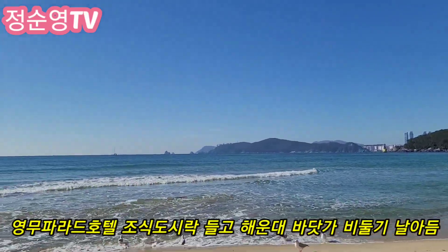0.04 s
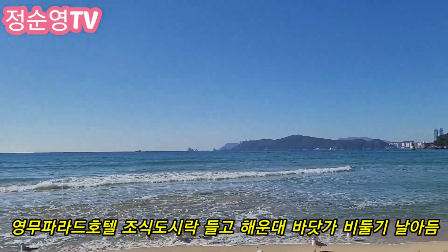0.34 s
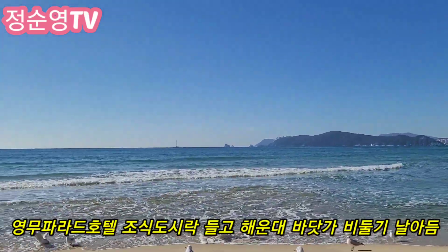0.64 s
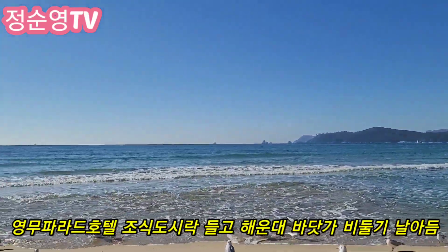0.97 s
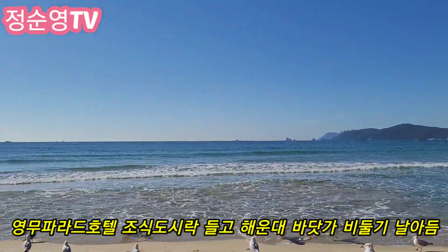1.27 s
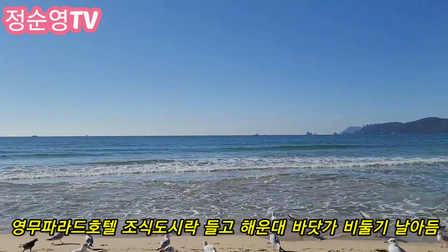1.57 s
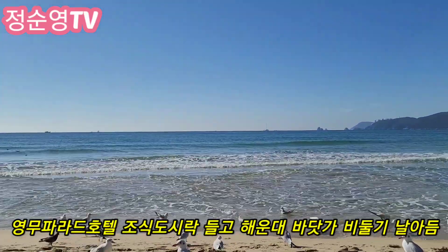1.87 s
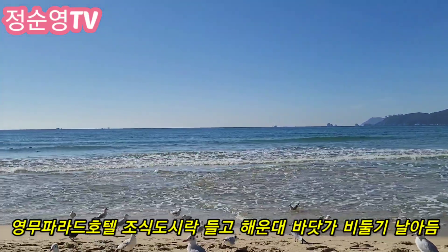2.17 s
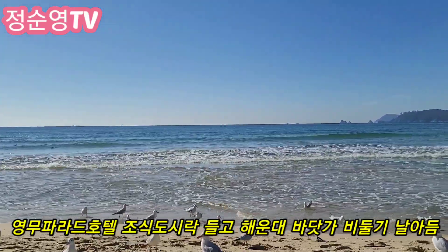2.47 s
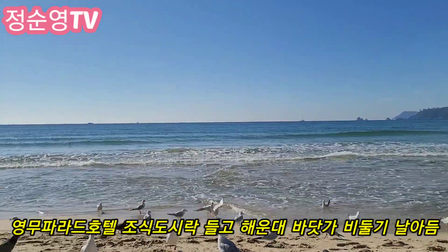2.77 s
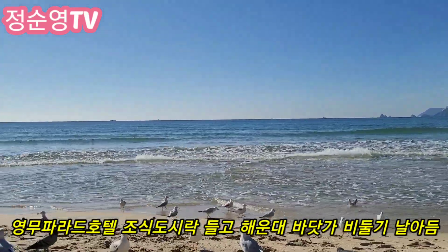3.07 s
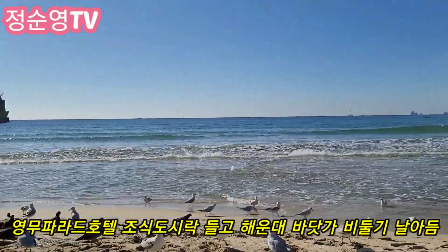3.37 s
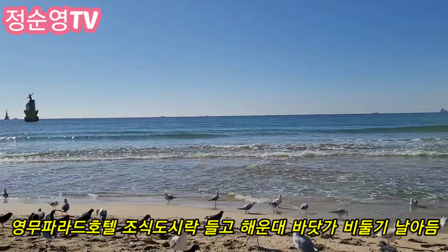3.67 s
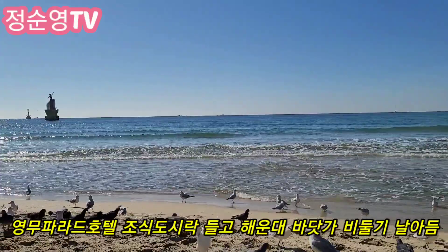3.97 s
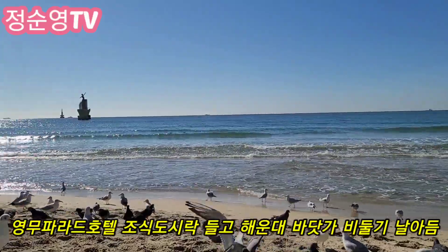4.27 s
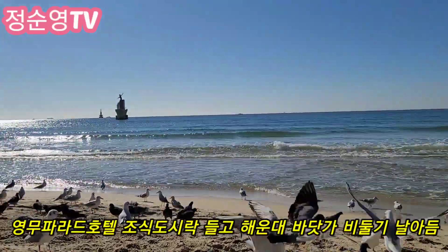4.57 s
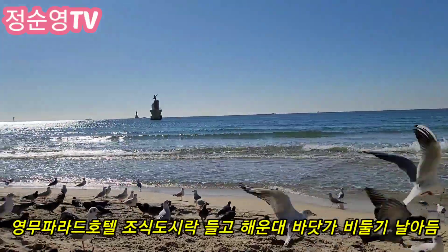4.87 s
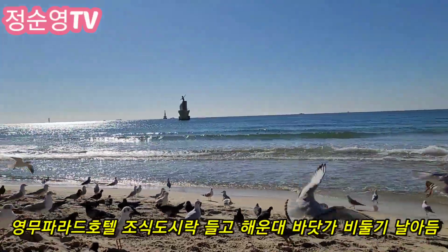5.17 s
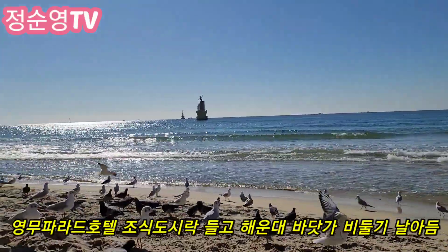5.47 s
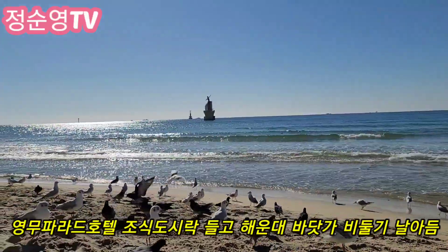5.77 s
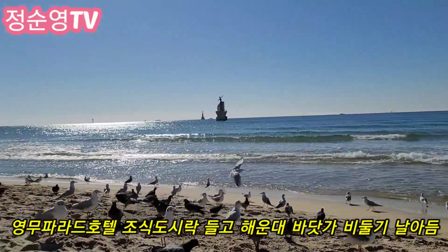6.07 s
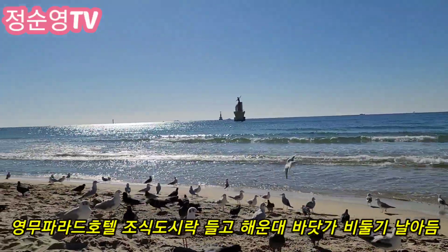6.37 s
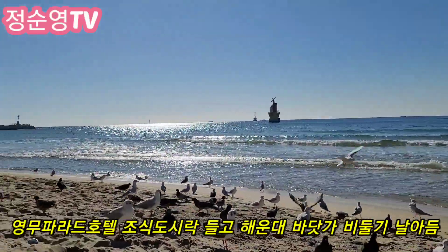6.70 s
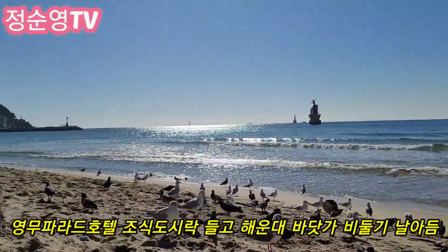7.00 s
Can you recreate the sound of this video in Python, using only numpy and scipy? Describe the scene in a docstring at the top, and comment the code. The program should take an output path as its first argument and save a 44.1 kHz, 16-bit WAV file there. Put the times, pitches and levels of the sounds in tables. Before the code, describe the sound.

Short raspy gull squawks and a few higher squeals sound on a beach, with fizzing wavelets and gusts buffeting the microphone.

```python
"""Small surf and a rumble of wind, then at once gulls squabbling on a sandy beach, a few steps away.
Each cry is a whistle near 1 kHz, arching in pitch and chopped about 100 times a second into a harsh
rattle; a few squeals lie an octave higher, and the flock chatters further off. Wavelets churn and fizz
behind the birds. Gusts buffet the two microphone ports of a hand-held phone, which turns slowly."""
import sys
import numpy as np
from scipy import signal
from scipy.fft import rfft, irfft
from scipy.io import wavfile
from scipy.ndimage import uniform_filter1d, map_coordinates

SR = 44100
rng = np.random.default_rng(int(sys.argv[2]) if len(sys.argv) > 2 else 0)


def store_pcm(level_fs):
    """Save levels as 16-bit WAV."""
    pcm = np.round(np.clip(level_fs, -1, 1) * 32767).astype(np.int16)
    wavfile.write(sys.argv[1], SR, np.atleast_2d(pcm).T)


N = 314874
TIME = np.arange(N) / SR
TOP_HZ = 15900  # upper limit of the phone


def undb(db):
    """Decibels to gain."""
    return 10 ** (np.asarray(db) / 20)


def unit(x):
    """Scale to rms 1."""
    return x / np.sqrt(np.mean(x ** 2) + 1e-18)


def curves(table):
    """The columns of a table of (t/s, ...) rows, sample by sample."""
    times, *columns = np.transpose(table)
    return [np.interp(TIME, times, column) for column in columns]


def along(hz, points):
    """Read (f/Hz, value) points on a log-frequency axis."""
    at, value = np.transpose(points)
    return np.interp(np.log(np.maximum(hz, 1)), np.log(at), value)


def colour(x, points):
    """Filter by a spectrum of (f/Hz, gain/dB) points."""
    n = x.shape[-1]
    return irfft(rfft(x) * undb(along(np.fft.rfftfreq(n, 1 / SR), points)), n)


def walk(rate, n=N):
    """Smooth random drift that changes rate times a second; spread near 1."""
    k = max(int(SR / rate), 1)
    held = np.repeat(rng.standard_normal(n // k + 1), k)
    return np.sqrt(2) * uniform_filter1d(uniform_filter1d(held, k), k)[:n]


def pan(db):
    """Left and right gains for a level difference, at constant power."""
    gains = undb(np.array([db, -db]) / 2).reshape(2, -1)
    return gains / np.sqrt(np.mean(gains ** 2, axis=0))


def add(out, start, sound):
    """Mix a sound (channels x samples) in at a time."""
    i = max(int(start * SR), 0)
    out[:, i:i + sound.shape[1]] += sound[:, :max(N - i, 0)]


def surf(wash_db=7, foam_db=3.0, churn_db=2.05, fizz_db=1.0):
    """Behind the birds, breaking wavelets churn in the middle range while bursting foam fizzes above."""
    # rise and fall of the surf: t/s, relative wash level/dB, relative foam level/dB
    swell = [(0, -46.5, -50.5), (.6, -47.5, -51), (1.3, -48, -54), (2.3, -49.5, -57.5), (4.3, -48, -55),
             (5.9, -49, -55), (6.75, -47, -51.5), (7.14, -46.5, -52)]
    # spectrum of the surf: f/Hz, level/dB
    wash_colour = [(150, -25), (250, -2.5), (313, -8.5), (649, -2), (857, -9), (1230, -2.5), (1370, -2.5),
                   (1780, -2.5), (2380, -6.5), (3150, -10.5), (3430, -12.5), (4080, -15), (4770, -18.5),
                   (6990, -20), (15800, -30.5)]
    # likeness of the surf at the two ports: f/Hz, correlation
    port_likeness = [(250, 0.83), (600, 0.57), (1200, -0.27), (2000, 0.24), (4000, -0.042), (12000, 0.018)]
    # the sea swings rightwards as the phone turns: t/s, left minus right/dB
    sea_side = [(1.8, 2.5), (4.4, 2), (4.9, -0.5), (7.14, -0.5)]
    body_db, hiss_db = curves(swell)
    hz = np.fft.rfftfreq(N, 1 / SR)
    likeness = np.clip(along(hz, port_likeness), -1, 1)
    mid, side = rfft(rng.standard_normal((2, N)) * undb(fizz_db * np.array([walk(1500), walk(1500)])))
    mid, side = mid * np.sqrt(1 + likeness), side * np.sqrt(1 - likeness)
    spectrum = rfft(colour(irfft(np.array([mid + side, mid - side]), N), wash_colour))
    octave = np.clip(np.log2(np.maximum(hz, 1) / 250), 0, 6)
    bands = (irfft(spectrum * np.maximum(1 - abs(octave - k), 0), N) for k in range(7))
    water = sum(band * undb(churn_db * walk(12)) for band in bands)  # each octave swells on its own
    foam = colour(water, [(2200, -25), (4500, -1.0)])
    sea = unit(water - foam) * undb(body_db + wash_db) + unit(foam) * undb(hiss_db + foam_db)
    return sea * pan(curves(sea_side)[0])


def wind_force(attack_s=0.086, release_s=0.078, lee_db=-29, swirl_db=3.0, swirl_rate=15):
    """Wind strength at each port: a swirling breeze, plus gusts that swell, hold and die away."""
    # gusts on the windward (left) port: t/s, hold/s, level/dB
    gust_times = [(0.726, 0.48, -35.5), (1.557, 0.23, -32), (1.862, 0.17, -29.5), (2.14, .27, -35.5),
                  (2.568, 0.29, -34), (4.007, 0.23, -26.5), (4.339, 0.11, -28), (4.546, 0.029, -27)]
    # the breeze on both ports, with its lulls: t/s, level/dB
    breeze_level = [(0, -40), (2.95, -40), (3.12, -47.5), (3.25, -37.5), (3.45, -42), (3.7, -41.5),
                    (5.05, -36.5), (5.3, -45), (6.25, -37), (7.14, -40)]
    gusts = np.zeros(N)
    for start, hold, db in gust_times:
        corners = [start - attack_s, start, start + hold, start + hold + release_s]
        gusts += undb(db) * np.interp(TIME, corners, [0, 1, 1, 0])
    force = np.hypot(undb(curves(breeze_level)[0]), gusts * undb([[0], [lee_db]]))
    return force * undb(swirl_db * np.array([walk(swirl_rate), walk(swirl_rate)]))


def wind(rumble_db=3, eddy_db=-5.0, strong_db=-27, eddy_growth=0.7, flutter_db=3.0):
    """Each microphone port rumbles on its own; the stronger the gust, the more quick eddies it carries."""
    # rumble of a light breeze on a port: f/Hz, level/dB
    breeze_colour = [(18, -31), (35, -5), (60, 0.5), (100, -4.5), (160, -11.5), (300, -37.5), (600, -62)]
    # eddies in a strong gust: f/Hz, level/dB
    eddy_colour = [(40, -47), (110, -5), (200, 4), (320, -5), (500, -18.5), (900, -80)]
    force = wind_force()
    slow, quick = rng.standard_normal((2, 2, N))
    eddy_share = undb(eddy_db) * np.minimum(force / undb(strong_db), 2) ** eddy_growth
    eddies = unit(colour(quick, eddy_colour)) * eddy_share * undb(flutter_db * walk(35))
    return force * (undb(rumble_db) * unit(colour(slow, breeze_colour)) + eddies)


def thumps():
    """Short dull knocks of air right on the ports, a few cycles each."""
    # knocks of air: t/s, f/Hz, decay/s, peak/dB, left minus right/dB
    knocks = [(0.061, 88, 0.01, -23, -19), (0.753, 109, 0.0088, -16, 33), (3.582, 260, 0.011, -26.5, 21),
              (3.603, 343, 0.0035, -26, 24), (4.109, 125, 0.0097, -16, 21)]
    out, t = np.zeros((2, N)), TIME[:SR // 8]
    for start, hz, decay, db, pan_db in knocks:
        swell = 2 * t / decay * np.exp(1 - 2 * t / decay)
        phase = 2 * np.pi * np.cumsum(hz * (1 + 0.18 * walk(197, len(t)))) / SR
        add(out, start, undb(db) * pan(pan_db) * swell * np.sin(phase))
    return out


def cry(length, top_hz, glide, rattle_hz, rasp, ring_db, bright_db, edge_db,
        chirp=0.18, waver=0.01835, hiss_db=-10, spit_db=3, tremble_db=1.5):
    """One cry at the beak, after a half-length lead-in: a whistling membrane chopped by a slower one."""
    # arch of a cry: share of its length, share of the top pitch, level/dB
    arch = [(-.45, .66, -32.5), (-.06, .72, -14), (0.099, .92, -1.5), (.28, 0.98, 3), (0.519, 0.98, 3),
            (.76, .93, 0), (0.919, .84, -6), (1.05, .72, -16), (1.15, 0.44, -36)]
    # resonances of throat and beak: f/Hz, gain/dB
    throat = [(600, -25.5), (1050, -23), (1450, 5), (2050, 1.5), (2600, 4), (3200, 2), (3600, 0),
              (4200, -4), (5400, -9), (6000, -15), (6900, -15), (8300, -25.5), (12000, -26), (15000, -25.5)]
    t = np.arange(int(2 * length * SR)) / SR - length / 2
    n, part = len(t), t / length
    share, pitch, loud_db = np.transpose(arch)
    pulses = rattle_hz * np.cumsum(1 + 0.084 * rasp * walk(150, n)) / SR
    pulses = pulses - pulses[n // 4]  # counted from the end of the lead-in
    cycle = pulses % 1
    # the slow valve shuts briefly in each cycle; it leaks in raspy cries and in the lead-in
    opening = np.clip((np.minimum(cycle, 1 - cycle) - .06) / .22, 0, 1)
    leak = np.clip(0.7 * rasp ** 2 - 5 * np.minimum(part, 0), 0, 1)
    gate = leak + (1 - leak) * np.sin(np.pi / 2 * opening) ** 2
    hz = top_hz * np.interp(part, share, pitch) * (1 + glide * (part - .5))
    hz *= 1 + chirp * (1 - leak) * (cycle - .5)  # rises within each pulse as pressure builds
    hz *= 1 + .018 * rng.standard_normal(64)[np.floor(pulses).astype(int)]  # each pulse has its own note
    # the membrane loses its footing near each closure, which smears the upper partials
    unsteady = .024 + .025 * rasp + .05 * (1 - opening)
    phase = 2 * np.pi * np.cumsum(hz * (1 + waver * walk(200.5, n) + unsteady * walk(2500, n))) / SR
    # the partials leave the throat out of step, which rounds the wave
    orders = np.arange(1, int(TOP_HZ / top_hz) + 2)
    offsets = np.pi / 4 * orders ** 2 + .5 * rng.standard_normal(24)[:len(orders)]
    whistle = sum(np.sin(k * phase + offset) for k, offset in zip(orders, offsets))
    # air hisses through each opening, most of all in the top treble
    hiss = colour(rng.standard_normal(n), [(6000, hiss_db), (10000, spit_db)]) * np.hypot(rasp, .35)
    envelope = undb(np.interp(part, share, loud_db) + tremble_db * walk(104.8, n))
    source = (unit(whistle) + hiss) * gate * envelope
    # a wider beak lets more treble out
    beak = [(2350, 0), (2900, ring_db), (4200, ring_db),
            (5000, bright_db), (7500, bright_db), (10500, edge_db)]
    return colour(colour(source, throat), beak)


def scattered(voice, db, half_db=-34, blur_s=0.0069):
    """The fainter a gull, the further off it is, and the more its cry is blurred by sand and water."""
    t = TIME[:SR // 16]
    paths = rng.standard_normal(len(t)) * np.exp(-t / blur_s)
    blurred = unit(signal.fftconvolve(voice, paths)[:len(voice)])
    share = 1 / (1 + undb(db - half_db) ** 3)
    return (np.sqrt(1 - share) * unit(voice) + np.sqrt(share) * blurred) / np.sqrt(2)


def sand(voice, near_db=-12, decay_s=.0015):
    """Rough sand close by scatters a cry at once, differently for every cry and each port."""
    t = TIME[:SR // 64]
    paths = rng.standard_normal((2, len(t))) * np.exp(-t / decay_s)
    reflected = signal.fftconvolve(voice[None], unit(paths) / np.sqrt(len(t)))[:, :len(voice)]
    return voice + undb(near_db) * reflected


def gull(start, length, db, top_hz, glide, rasp, ring_db, bright_db, mean_rattle_hz=104):
    """One cry as it reaches the microphone: the beak's opening sets its colour, distance its blur."""
    # top treble of the cries, above 10 kHz: t/s, gain/dB
    top_treble = [(.4, -4), (1.2, -1.5), (1.7, 1), (2.3, 8), (2.8, -7.5), (3.8, -4), (4.4, -11.5),
                  (6.1, -2)]
    rattle_hz = mean_rattle_hz * (1 + .04 * rng.standard_normal())
    edge_db = np.interp(start, *np.transpose(top_treble))
    voice = cry(length, top_hz, glide, rattle_hz, rasp, ring_db, bright_db, edge_db)
    return undb(db) * sand(scattered(voice, db))


def squawk(start, length, db, top_hz, ring_db, bright_db):
    """A short rattling cry, hoarsest when weak; its pitch sags when the beak stays narrow."""
    # hoarseness of a squawk: level/dB, rasp (0-1)
    hoarseness = [(-41.5, 0.97), (-33.5, 0.34), (-24, 0.52)]
    rasp = np.interp(db, *np.transpose(hoarseness))
    glide = -0.0468 + 0.00903 * ring_db
    return gull(start, length, db, top_hz, glide, rasp, ring_db, bright_db)


def chatter(per_s=4, level_db=-45.5, top_hz=982, length_s=(0.044, 0.061), ring_db=-2, bright_db=-5.5):
    """The flock further off: rows of settings for faint squawks at loose intervals."""
    rows = []
    for k, (late, long, loud, high) in enumerate(rng.uniform(-1, 1, (40, 4))):
        start = (k + .5 + late / 2) / per_s
        length = np.interp(long, (-1, 1), length_s)
        if start < TIME[-1]:
            rows.append((start, length, level_db + 2 * loud, top_hz * (1 + .06 * high), ring_db, bright_db))
    return rows


def gulls(squeal_rasp=.85):
    """The squabble on the sand: squawks and squeals a few steps away, chatter beyond them."""
    # harsh squawks: t/s, length/s, relative level/dB, top pitch/Hz, beak ring near 3.5 kHz/dB,
    # brightness/dB
    squawks = [(0.086, 0.069, -42, 923, 3.5, -10), (0.22, 0.031, -41, 996, 12, 2),
               (0.363, .033, -26.5, 1120, 0.5, 5.5), (0.396, 0.036, -37.5, 986, 8.5, -10),
               (0.781, 0.064, -42.5, 1035, -1.5, -11), (0.868, .05, -43, 988, 0.5, -12),
               (0.94, 0.045, -30.5, 1009, -2.5, -5), (1.178, .045, -24.5, 1061, 1, -2.5),
               (1.48, 0.06, -28.5, 964, -6.5, -2), (1.702, 0.059, -27, 1065, -2, 5.5),
               (1.858, 0.071, -40, 980, 8, -16), (1.907, 0.067, -23.5, 1089, 3.5, 7.5),
               (2.158, 0.057, -22.5, 1081, 3, 6.5), (2.363, 0.064, -22.5, 1102, 3, 4.5),
               (2.563, 0.062, -22, 1103, 0.5, 4.5), (2.651, 0.063, -40, 982, -3, -7),
               (2.808, 0.062, -24.5, 1035, -5.5, 1), (3.008, .063, -36, 964, -6, -18),
               (3.064, .051, -38.5, 870, -5.5, -12), (3.139, 0.045, -41, 1257, -10.5, -24),
               (3.211, 0.053, -25, 1050, -2.5, -4), (3.501, 0.054, -23, 1052, -4, -2.5),
               (3.755, 0.085, -22.5, 1112, -4, -3), (3.93, 0.063, -22.5, 1089, -1, 5.5),
               (4.013, .038, -25, 1092, 3, 5.5), (4.106, 0.033, -35, 992, 3.5, 9),
               (4.186, 0.079, -28, 1029, -2, 2), (4.426, 0.061, -29.5, 1063, -1, -2.5),
               (4.624, 0.058, -29, 1067, -2, -3.5), (4.852, .055, -32, 1066, -3.5, -17),
               (5.047, 0.075, -31.5, 1068, -5, -2), (5.299, 0.066, -35.5, 956, -4, -11),
               (5.431, 0.14, -34, 975, 1, -8.5), (5.742, 0.098, -42.5, 962, -7, -5),
               (6.078, 0.043, -29.5, 1033, -4, -3.5), (6.3, 0.057, -28, 1041, 0, -1),
               (6.397, 0.039, -43.5, 980, -2, -5)]
    # hoarse squeals an octave higher: t/s, length/s, relative level/dB, top pitch/Hz,
    # glide (share of the pitch), beak ring/dB, brightness/dB
    squeals = [(0.504, 0.089, -37, 1876, -.2, 1, -6), (3.438, 0.06, -34.5, 2263, -0.087, 8, 3),
               (4.492, 0.074, -27.5, 2003, 0.27, -7.5, -12), (4.734, .11, -27, 2018, .13, 2.5, -2.5),
               (5.104, 0.064, -29.5, 1940, -0.054, -30, -9)]
    voices = np.zeros((2, N))
    for start, length, db, top_hz, glide, *beak in squeals:
        add(voices, start - length / 2, gull(start, length, db, top_hz, glide, squeal_rasp, *beak))
    for start, length, *voice in list(squawks) + chatter():
        add(voices, start - length / 2, squawk(start, length, *voice))
    return voices


def turning_phone(voices, gain_db=4.0, first_lag_ms=-.025, lag_ms_per_s=.057):
    """The cries reach the left port later and later as the phone turns steadily away."""
    # the phone body colours a cry at each port: f/Hz, left minus right/dB, left phase lead/rad
    ports = [(1100, 2, -.2), (2100, 7, -.6), (2600, 4.5, -1.3), (3200, -3, -2.2), (3800, -6, -4.3),
             (4400, -1, -5.8), (5000, 2, -6.3), (6000, -1.5, -6.6), (7100, -2.5, -6.2), (8400, 5, -4.5),
             (10000, 1, -7), (11800, -2.5, -8.3), (13000, -2, -6.6), (15000, 3, -7.2)]
    # the flock ends up to the right as the phone turns: t/s, left minus right/dB
    flock_side = [(0, 0), (3.3, 1), (4.6, 1), (6, -2)]
    lag_ms = first_lag_ms + lag_ms_per_s * TIME
    left = map_coordinates(voices[0], [(TIME - lag_ms / 1000) * SR], order=5)
    hz = np.fft.rfftfreq(N, 1 / SR)
    balance_db = along(hz, np.array(ports)[:, [0, 1]])
    lead = along(hz, np.array(ports)[:, [0, 2]])
    spectra = np.array([rfft(left) * np.exp(1j * lead), rfft(voices[1])]) * pan(balance_db)
    return undb(gain_db) * irfft(spectra, N) * pan(curves(flock_side)[0])


def beach(x, far_db=-23, decay_s=0.021):
    """A faint dull tail returns from further along the beach."""
    t = TIME[:SR // 2]
    tail = colour(rng.standard_normal((2, len(t))), [(2500, -9), (8000, -22)]) * np.exp(-t / decay_s)
    return x + signal.fftconvolve(x, undb(far_db) * unit(tail) / np.sqrt(len(t)), axes=1)[:, :N]


def scene():
    """The sea behind, wind on the microphone, gulls on the sand."""
    return surf() + wind() + thumps() + beach(turning_phone(gulls()))


def record(dry):
    """The phone cuts the top treble steeply."""
    return signal.sosfilt(signal.ellip(10, .2, 80, TOP_HZ, fs=SR, output="sos"), dry)


dry = scene()
out = record(dry)
store_pcm(out)
```